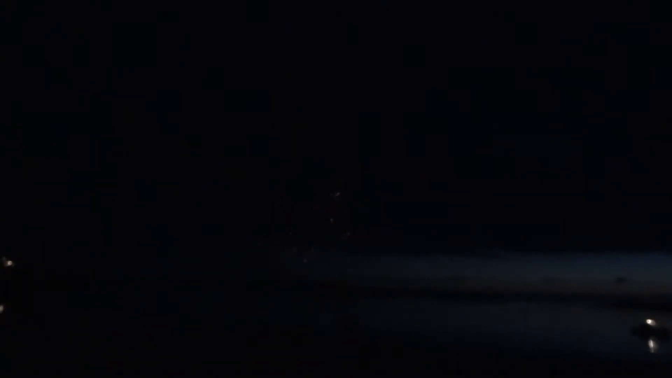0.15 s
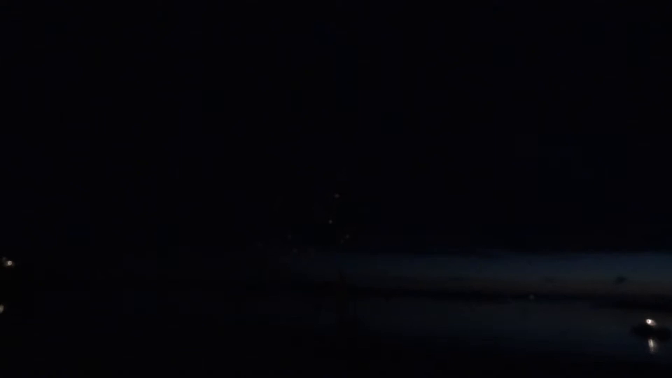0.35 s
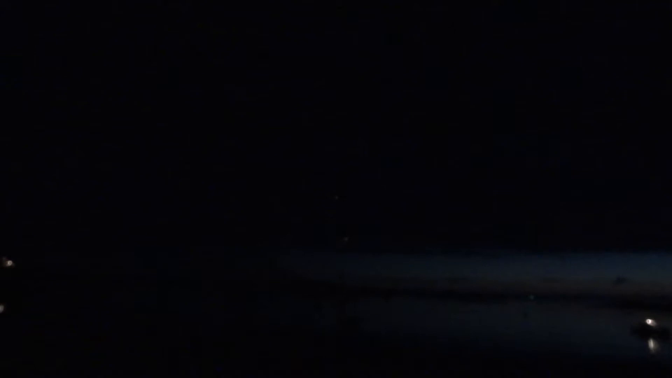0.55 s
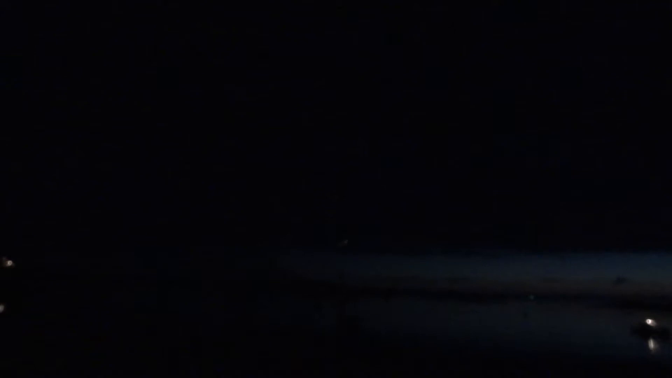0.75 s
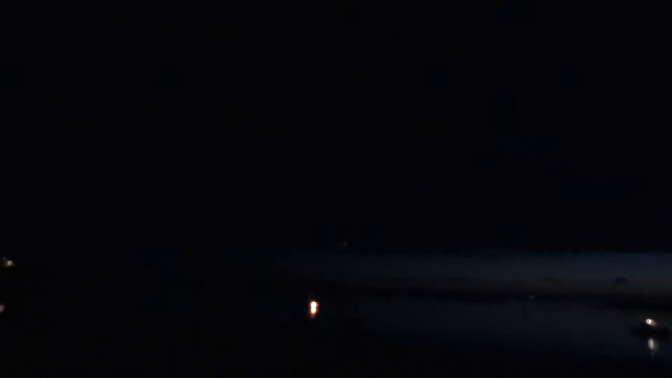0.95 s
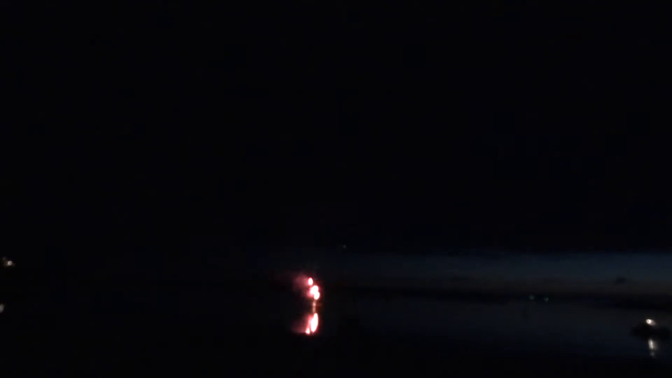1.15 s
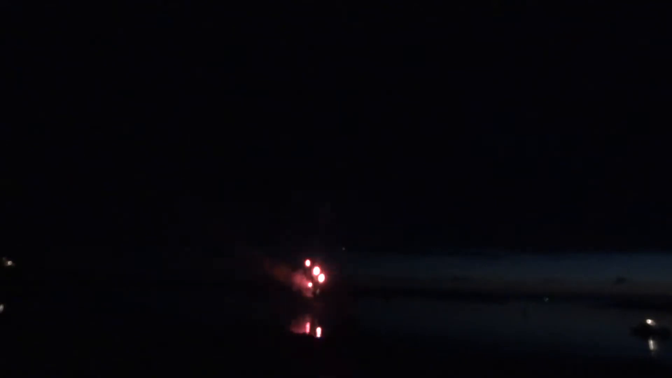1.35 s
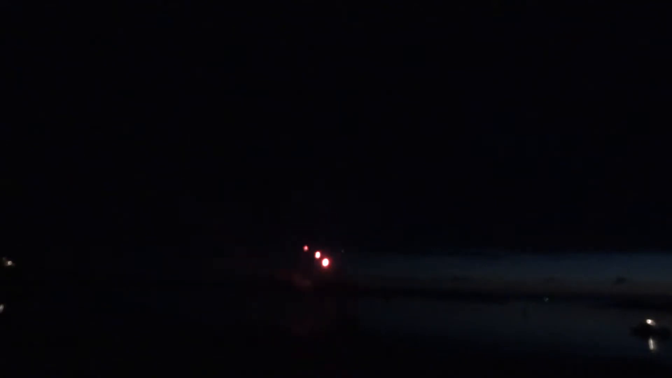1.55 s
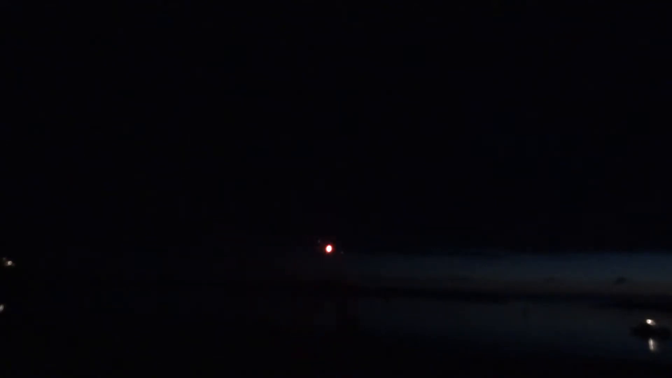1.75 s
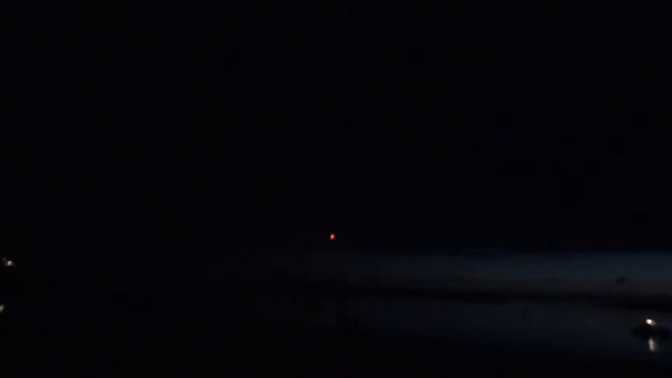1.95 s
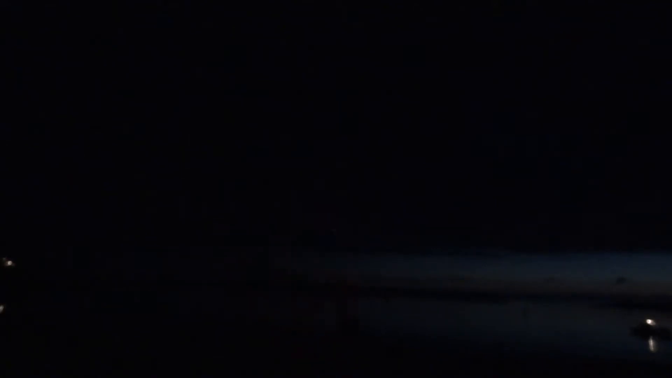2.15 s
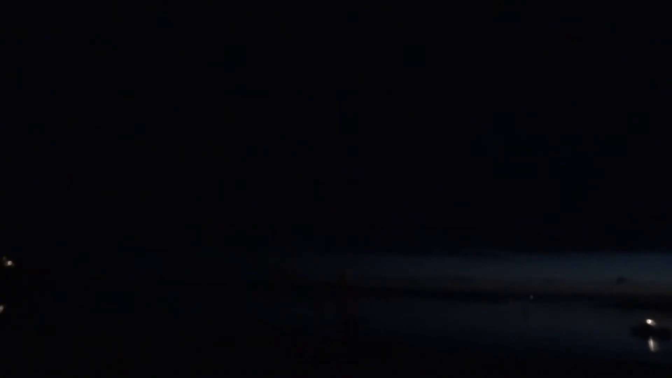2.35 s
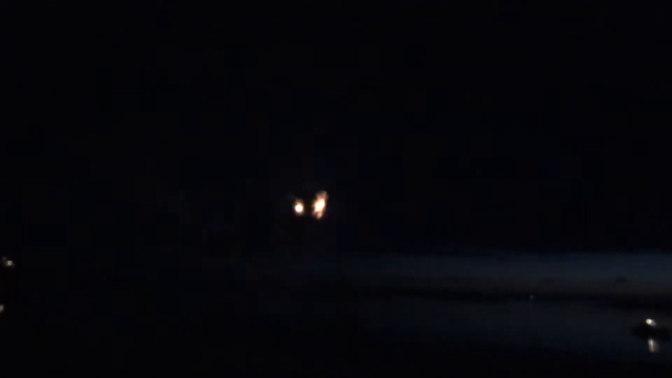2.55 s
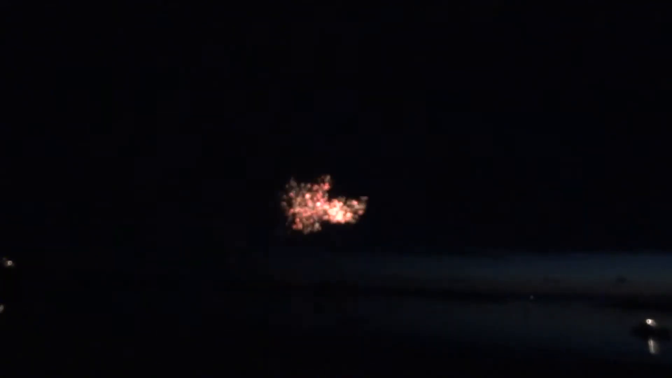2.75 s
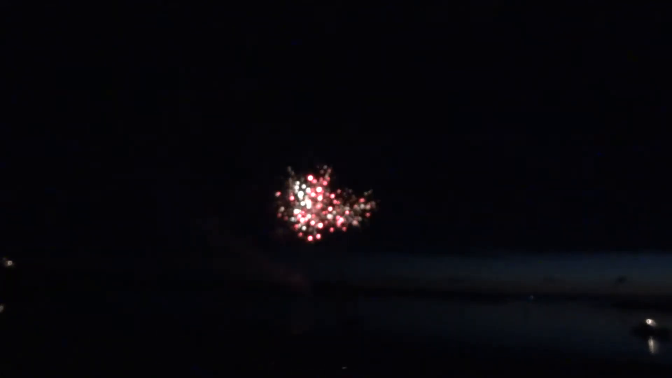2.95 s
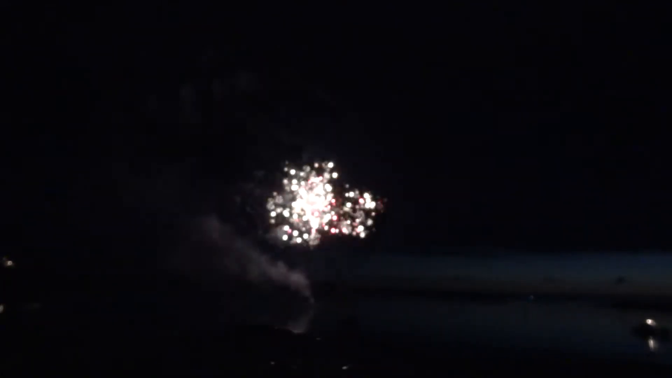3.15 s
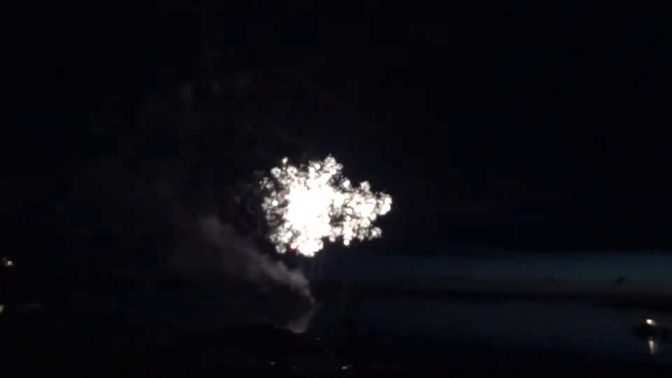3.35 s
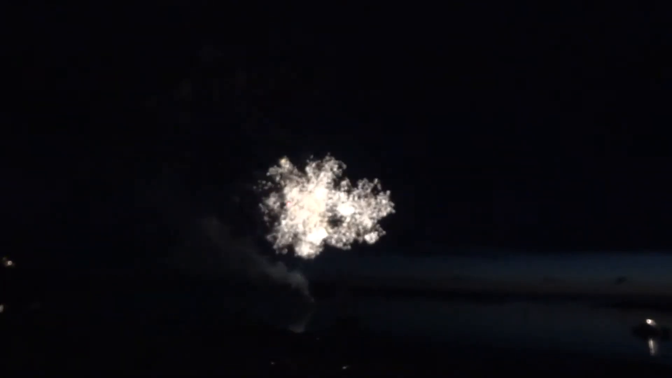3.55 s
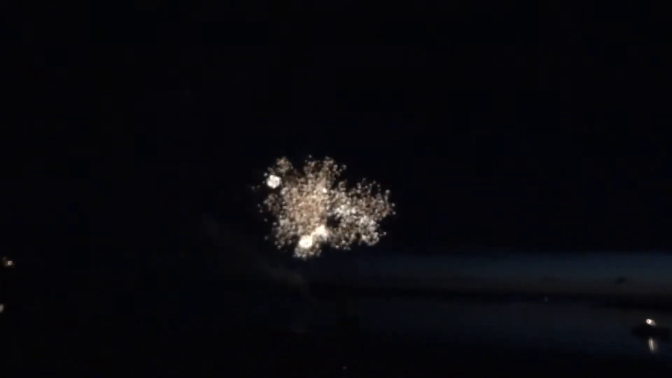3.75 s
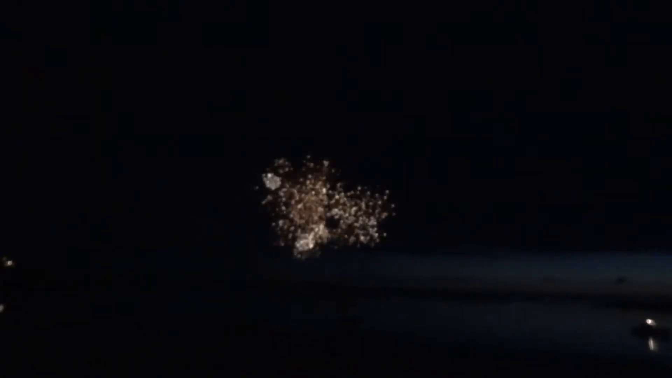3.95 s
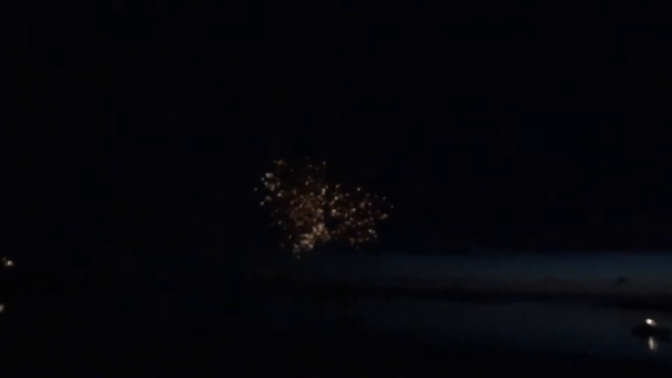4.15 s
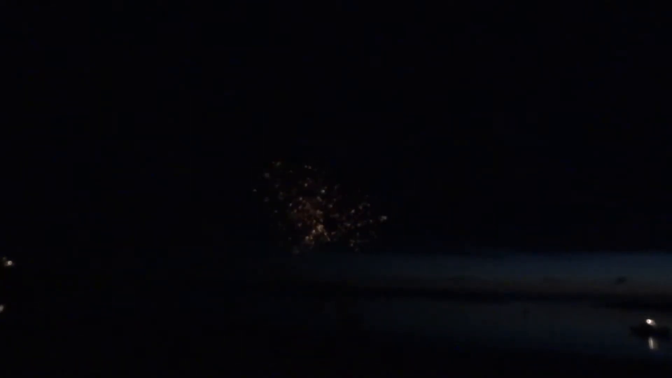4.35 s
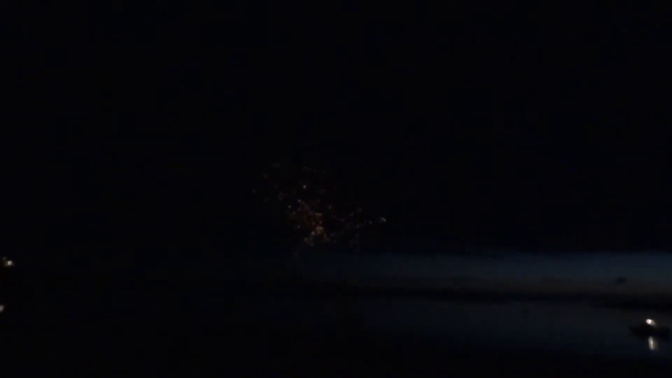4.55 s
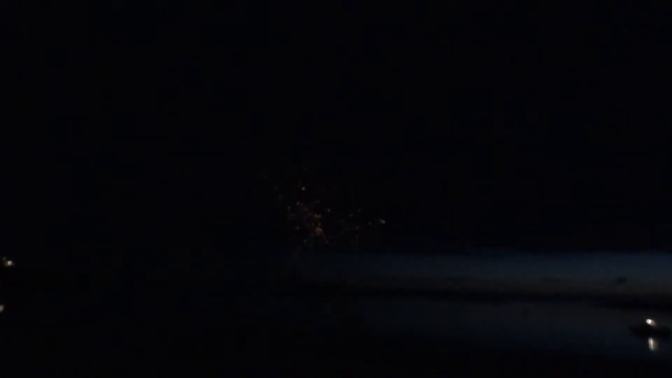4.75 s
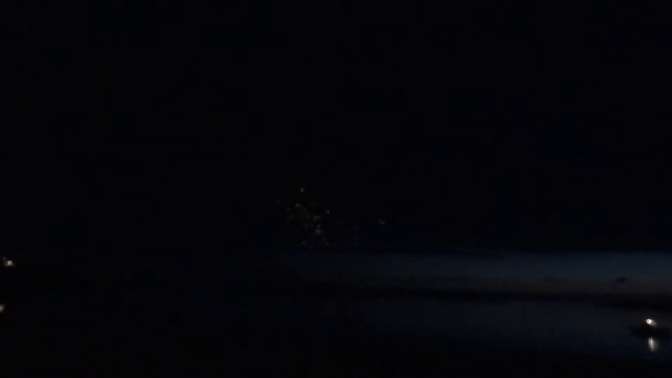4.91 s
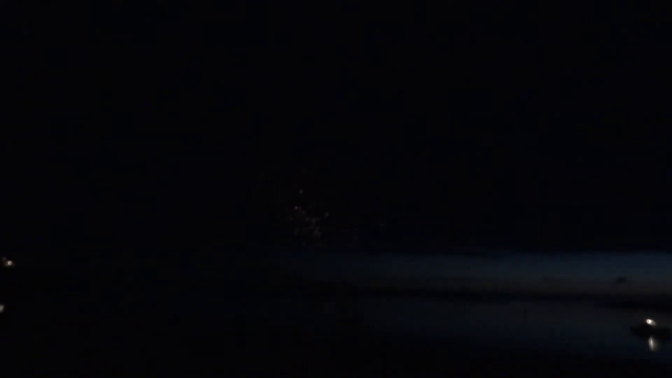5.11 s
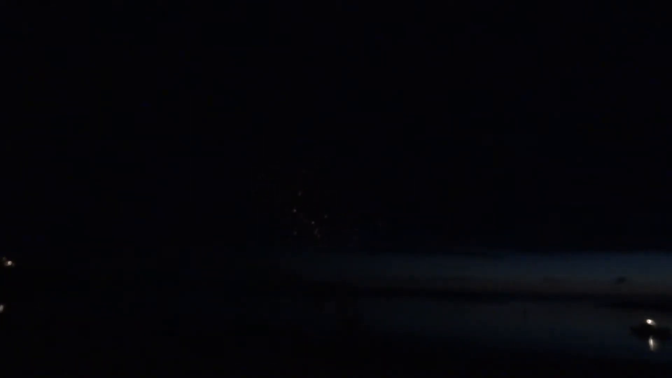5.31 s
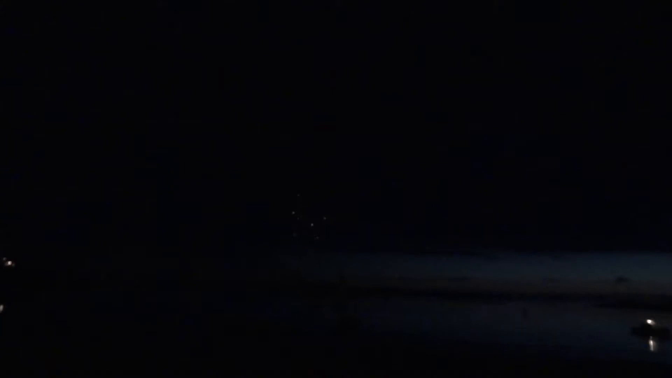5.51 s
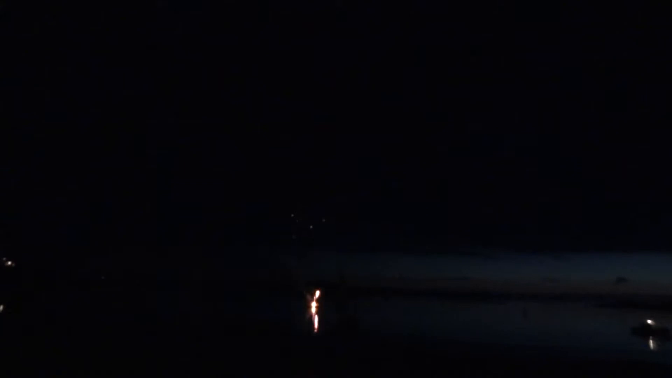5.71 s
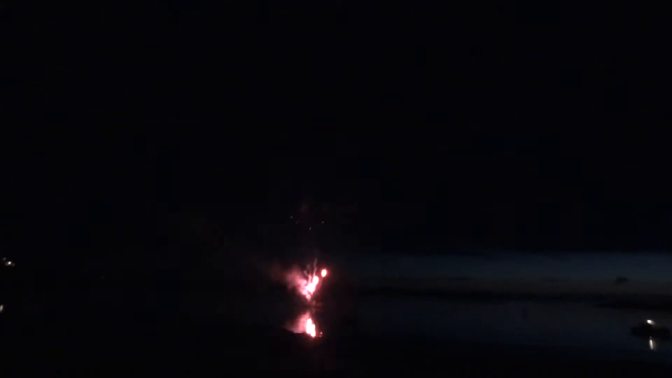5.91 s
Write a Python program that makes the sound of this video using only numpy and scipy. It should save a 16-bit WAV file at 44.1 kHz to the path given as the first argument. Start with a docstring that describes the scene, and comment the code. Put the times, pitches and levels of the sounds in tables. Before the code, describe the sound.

Fireworks over a harbour at night. As an earlier salvo fades, three mortars thump in quick succession and echo off the quays. A rapid cluster of loud shell bursts follows, then a cloud of crackling sparks swells and thins to single snaps. The shores return separate echoes, a low roll and a dulling hiss. Clothing rustles softly close to the microphone.

```python
"""Fireworks over a harbour at night: three mortars thump, a salvo of shells bursts, and a cloud of
crackling stars swells and thins out to single snaps. Each bang and snap is a shock wave, a push of air
followed by suction. The shores send it all back as single echoes, a low roll and a dulling hiss, while
an earlier salvo is still dying away. Clothing rubs and creaks softly near the microphone."""
import sys
import numpy as np
from scipy import signal
from scipy.fft import rfft, irfft
from scipy.io import wavfile

SR = 44100
rng = np.random.default_rng(int(sys.argv[2]) if len(sys.argv) > 2 else 0)


def store_pcm(level_fs):
    """Save levels as 16-bit WAV."""
    pcm = np.round(np.clip(level_fs, -1, 1) * 32767).astype(np.int16)
    wavfile.write(sys.argv[1], SR, np.atleast_2d(pcm).T)


N = 263718
TIME = np.arange(N) / SR

# shells bursting overhead: start_s, level_db, edge_hz
SHELL_BURSTS = [(3.1810, 0, 4020), (3.1907, -1.5, 3620), (3.2206, -7, 3000), (3.2277, 0.5, 4250),
                (3.237, -3.5, 4220), (3.2662, 0.5, 4500), (3.2687, -9, 1800), (3.2961, -0.5, 4700),
                (3.3057, -2, 3860), (3.3371, -7, 2200), (3.3642, -4, 3000), (3.3819, -2.5, 5630),
                (3.4295, -2.5, 6650), (3.5183, -11, 1500), (3.5427, -10, 6500), (3.559, -11, 5540),
                (3.6034, -2, 6040)]
# swarms of crackling sparks, silent if the end precedes the start:
# start_s, thickest_s, end_s, snaps_per_s, level_db
SPARK_SWARMS = [(1.74, 1.792, 2.45, 61, -26), (3.177, 3.35, 2.8, 110, -18), (3.658, 3.851, 4.33, 950, -4)]
# single stars that snap clear of the cloud: start_s, level_db
STAR_SNAPS = [(3.623, 1.5), (3.6446, 0), (3.673, -3), (4.1266, -5), (4.1376, -8), (4.1473, -5),
              (4.1622, -4), (4.1708, -3.5), (4.184, -10), (4.2027, -3), (4.2100, -5.5), (4.2185, -7),
              (4.2500, -6.5), (4.2557, -8), (4.3018, -5.5), (4.3039, -2.5)]
# tone of the crackle: frequency_hz, gain_db
CRACKLE_EQ = [(300, 3), (900, -3.5), (1700, -4), (2800, -1), (4200, 1), (6000, -3), (11000, -11)]
# mortar shots: start_s, level_db, push_ms, edge_hz, wet_db
MORTAR_SHOTS = [(1.642, -1.5, 1.64, 4000, 5.5), (1.7035, -2, 1.3, 4570, -3.5), (1.7493, -3, 1.54, 5950, 3)]
# slapback from flat faces near the mortars: delay_s, gain_db
MORTAR_SLAPS = [(.0031, -21), (.0052, -37), (0.017, -14.5), (0.0313, -17.5)]
# distinct echoes from quays and far shores: start_s, level_db, push_ms
QUAY_ECHOES = [(.0625, -20, 1.3), (.0810, -24, 3.3), (0.2397, -19, 1.6), (0.741, -39, 1.3),
               (1.7802, -15, 0.28), (1.7968, -18, 0.26), (1.8492, -15.5, 0.26), (1.8907, -10.5, 0.15),
               (1.9570, -17, 1.6), (2.0231, -22, 0.26), (2.0691, -16, 0.17), (2.2341, -19.5, 0.26),
               (2.5564, -24.5, 1.14), (2.6190, -23.5, 0.81), (2.963, -22.5, 1.4), (4.495, -15, 1.1),
               (4.5422, -6, 0.86), (4.6885, -14, 1.5), (4.7450, -14.5, 1.1), (4.7880, -14, 0.23),
               (4.811, -17, .26), (4.9566, -19, 1.6), (4.9660, -14, 0.75), (5.106, -21, 1.2),
               (5.1202, -28, 1)]
# volleys that the harbour answers; mortars at ground level barely reach the far shores:
# start_s, length_s, roll_db, hiss_db, far_send_db
VOLLEY_SENDS = [(1.673, .12, -22, -35.5, -27), (3.176, 0.38, -15.5, -29, -0.5),
                (3.614, .14, -16.5, -23, -19), (3.748, 0.22, -37, -27.5, 2.5)]
# returns from the near bank and the whole basin: delay_s, linger_s, roll_db, hiss_db
NEAR_BANKS = [(0, 0.024, -1, -5.5), (0.03, 0.56, -3.5, 2.5)]
# later returns from two far shores: delay_s, linger_s, roll_db, hiss_db
FAR_SHORES = [(.72, 0.16, -11, -6), (1.29, 0.19, -8.5, -9.5)]
# tone of the low roll: frequency_hz, gain_db
ROLL_EQ = [(15, -65), (25, -36), (96, -15), (139, -7.5), (223, -2), (289, -1.5), (313, -1), (419, -3),
           (517, -7), (560, -9.5), (628, -15), (957, -16.5), (1200, -23.5), (1560, -25.5), (2640, -120)]
# tone of the hiss before the air dulls it: frequency_hz, gain_db
HISS_EQ = [(300, -33), (600, 3), (800, -0.5), (1300, 0.5), (2000, 0), (3000, -3.5), (5000, -9),
           (7000, -16.5), (11000, -26.5)]
# booms that hang over the water after the mortars and the first bursts: start_s, level_db
DEEP_BOOMS = [(1.7, -38), (3.19, -40)]
# tone of the booms: frequency_hz, gain_db
BOOM_EQ = [(20, -22), (50, -7.5), (90, 2), (130, 6), (250, -24), (600, -78)]
# rubs of cloth: start_s, length_s, level_db
CLOTH_RUBS = [(1.454, 0.082, -44), (2.162, 0.089, -41.5), (2.65, 0.067, -45), (2.739, 0.069, -46.5)]
# moments when the cloth catches: centre_s, level_db
CLOTH_CATCHES = [(1.31, -52), (1.473, -40), (1.972, -41), (2.1657, -28), (2.191, -37), (2.212, -37),
                 (2.684, -33.5), (2.746, -38), (2.7876, -45)]
# tone of the rubbing fibres: frequency_hz, gain_db
CLOTH_EQ = [(800, -15), (2000, -0.5), (3600, 4.5), (5000, 6), (6400, 7.5), (8300, -1), (10300, 3.5),
            (11500, -8)]
# stereo image, where a likeness of 1 is mono: frequency_hz, likeness
STEREO_LIKENESS = [(30, 1), (110, 1), (270, 1), (580, 0.95), (1200, 0.88), (2600, 0.9), (5500, 0.78),
                   (11000, 0.71)]


def shock_wave(push_ms, edge_hz, recoil, low_cut_hz=175, turn_hz=2100, size=2048):
    """One bang of peak 1: a jump, a push, then suction. Recoil deepens the suction towards an N shape."""
    age = np.arange(size) / SR / (push_ms / 1000)  # in push lengths
    wave = (1 - age) * ((1 - recoil) * np.exp(-age) + recoil * np.exp(-(age / 2) ** 4))
    jf = 1j * np.fft.rfftfreq(size, 1 / SR)
    air = 1 / (1 + jf / edge_hz) ** 2  # distance rounds the front
    low_cut = jf ** 2 / (jf ** 2 + 2.12 * jf * low_cut_hz + low_cut_hz ** 2)
    turn = (turn_hz - jf) / (turn_hz + jf)  # the microphone inverts the treble: a thin spike leads
    wave = irfft(rfft(wave) * air * low_cut * turn)
    return wave / abs(wave).max()


def bangs(cues, recoil):
    """A mono track with one shock wave on each cue."""
    out = np.zeros(N)
    for start, db, push_ms, edge_hz in cues:
        add(out, start, amp(db) * shock_wave(push_ms, edge_hz, recoil))
    return out


def shells(push_ms=1.05):
    """Shells of one size burst in the open sky and arrive as N-shaped waves, almost dry."""
    cues = [(start, db, push_ms, edge_hz) for start, db, edge_hz in SHELL_BURSTS]
    return scatter(bangs(cues, recoil=0.84), wet_db=-8, t60_s=0.15, bass_db=-10)


def stars(push_ms=0.12, edge_hz=5000, recoil=0.45, low_cut_hz=400, spread_db=3, thin_db=-1.5, sizes=5):
    """Stars crackle as tiny shock waves: at random in swarms that swell and thin out, and singly."""
    crackle = np.zeros(N)
    for size in np.geomspace(0.75, 1.4, sizes):
        clicks = np.zeros(N)
        for start, thickest, end, per_s, db in SPARK_SWARMS:
            density = np.sin(np.pi / 2 * np.interp(TIME, [start, thickest, end], [0, 1, 0])) ** 2
            fired = rng.random(N) < density * per_s / sizes / SR
            snap_db = db + thin_db * (1.5 - density[fired])  # weaker where the swarm is thin
            clicks[fired] += amp(snap_db - spread_db * rng.exponential(1, N)[fired])
        crackle += signal.oaconvolve(clicks, shock_wave(push_ms * size, edge_hz, recoil, low_cut_hz))[:N]
    snap = shock_wave(push_ms, edge_hz, recoil, low_cut_hz)
    for start, db in STAR_SNAPS:
        add(crackle, start, amp(db) * snap)
    return scatter(equalise(crackle, CRACKLE_EQ), wet_db=-11, t60_s=0.07)


def mortars():
    """Each lift charge thumps, rattles off nearby things and slaps back from flat faces."""
    out = np.zeros((2, N))
    for *shot, wet_db in MORTAR_SHOTS:
        thump = bangs([shot], recoil=0.79)
        slapped = thump.copy()
        for delay, db in MORTAR_SLAPS:
            add(slapped, delay, amp(db) * thump)
        out += scatter(slapped, wet_db, t60_s=0.076, bass_db=-12.5, treble_db=-1)
    return out


def scatter(direct, wet_db, t60_s, bass_db=0, treble_db=0, taps_per_s=4000, size=22050):
    """Direct sound plus a stereo tail of small reflections from ground and ripples."""
    t = TIME[:size]
    taps = rng.standard_normal((2, size)) * (rng.random((2, size)) < taps_per_s / SR)
    fade_in = np.clip(t / 0.0015 - 1, 0, 1)
    tail = stereo(*taps) * amp(-60 * t / t60_s) * fade_in
    tone = [(150, bass_db), (500, bass_db / 2), (2000, 0), (8000, treble_db)]
    tail = equalise(tail / np.linalg.norm(tail[0]), tone)
    return direct + amp(wet_db) * signal.fftconvolve(direct[None], tail, axes=1)[:, :N]


def echoes(edge_at_1_ms_hz=930):
    """Single echoes stand out of the roll: long pushes as dull thuds, short ones as cracks."""
    cues = [(start, db, push_ms, edge_at_1_ms_hz / np.sqrt(push_ms)) for start, db, push_ms in QUAY_ECHOES]
    return scatter(bangs(cues, recoil=1), wet_db=-7, t60_s=0.021, bass_db=-14.5)


def bank_response(t, banks, levels_db):
    """Echo power over time: each bank answers after its delay, then dies away."""
    power = 0
    for (delay, linger, *_), db in zip(banks, levels_db):
        onset = np.clip((t - delay) / t[1] + 1, 0, 1)
        power += amp(db) ** 2 * onset * np.exp(-abs(t - delay) / linger) * t[1] / linger
    return power


def returned_power(t, loss_db_per_s, volley_db, near_db, far_db, ramp_s=0.031):
    """Every volley comes back delayed and smeared by the banks, fading on its way."""
    near = bank_response(t, NEAR_BANKS, near_db)
    far = bank_response(t, FAR_SHORES, far_db)
    loss = amp(-np.outer(loss_db_per_s, t)) ** 2
    power = 0
    for (start, length, *_, far_send_db), db in zip(VOLLEY_SENDS, volley_db):
        sent = amp(db) ** 2 * np.clip(np.minimum(t - start, start + length - t) / ramp_s, 0, 1)
        response = (near + amp(far_send_db) ** 2 * far) * loss
        power += signal.fftconvolve(sent[None], response, axes=1)
    return abs(power[:, :len(t)])


def harbour(air_db_per_khz_s=2.5, earlier_age_s=1.01):
    """The shores return the bangs as a roll, and the crackle as a hiss that dulls with distance."""
    tables = (VOLLEY_SENDS, NEAR_BANKS, FAR_SHORES)
    roll_db, hiss_db = zip(*(np.transpose(table)[2:4] for table in tables))
    roll = evened(equalise(patter(per_s=1100, spread_db=0.91), ROLL_EQ))
    hz, t, hiss_bands = signal.stft(patter(per_s=4500, spread_db=1.87), SR, nperseg=256)
    air_db_per_s = air_db_per_khz_s * hz / 1000
    # an earlier salvo is still dying away
    earlier_roll = amp(-32.5 - 3.5 * t)
    earlier_hiss = amp(-34.5 - 7 * t - np.outer(air_db_per_s, earlier_age_s + t))
    roll_level = np.sqrt(returned_power(t, 0, *roll_db)[0] + earlier_roll ** 2)
    hiss_level = np.sqrt(returned_power(t, air_db_per_s, *hiss_db) + earlier_hiss ** 2)
    tone = amp(curve_at(HISS_EQ, hz))[:, None]
    tone /= np.sqrt((tone[(hz > 1200) & (hz < 3000)] ** 2).sum() / len(hz))  # the mids set the level
    hiss = signal.istft(hiss_bands * tone * hiss_level, SR, nperseg=256)[1][:, :N]
    return roll * np.interp(TIME, t, roll_level) + hiss


def booms(rise_s=0.019, decay_db_per_s=22):
    """The deepest part of the big bangs comes back at once and dies away evenly."""
    envelope = np.zeros(N)
    for start, db in DEEP_BOOMS:
        age = TIME - start
        envelope += np.clip(age / rise_s, 0, 1) * amp(db - decay_db_per_s * abs(age))
    rumble = equalise(stereo(*rng.standard_normal((2, N))), BOOM_EQ)
    return evened(rumble) * envelope


def creak(fibres, span_s=(0.266, 0.405), slips_per_s=(140, 50), level_db=(-49.5, -41.5), decay_s=0.0036):
    """Cloth sticks and slips: a run of ticks that slows as it grows louder."""
    rate = np.interp(TIME, span_s, slips_per_s, left=0, right=0)
    slips = np.diff(np.floor(np.cumsum(rate) / SR), prepend=0)
    slips *= amp(np.interp(TIME, span_s, level_db))
    tick = fibres[:, :600] * np.exp(-TIME[:600] / decay_s)
    return signal.oaconvolve(slips[None], tick, axes=1)[:, :N]


def cloth(catch_s=0.0072, pan_db=0.9):
    """Fibres rub, catch and creak in short bright strokes, close by and a little to the right."""
    fibres = evened(equalise(patter(per_s=14000, spread_db=1.1), CLOTH_EQ))
    catches = [(centre - catch_s / 2, catch_s, db) for centre, db in CLOTH_CATCHES]
    envelope = np.zeros(N)
    for start, length, db in [*CLOTH_RUBS, *catches]:
        add(envelope, start, amp(db) * signal.windows.tukey(round(length * SR), 0.5))
    return (fibres * envelope + creak(fibres)) * amp([[-pan_db], [pan_db]])


def patter(per_s, spread_db):
    """Grainy stereo noise at rms 1: countless clicks of uneven strength."""
    strength = amp(spread_db * np.minimum(rng.exponential(1, (2, N)), 4))
    polarity = rng.choice([-1, 1], (2, N))
    fired = rng.random((2, N)) < per_s / SR
    return evened(stereo(*(strength * polarity * fired)))


def stereo(a, b):
    """Two unrelated signals become left and right, mono in the bass and wider on top."""
    size = len(a)
    likeness = curve_at(STEREO_LIKENESS, np.fft.rfftfreq(size, 1 / SR))
    mid = irfft(rfft(a) * np.sqrt((1 + likeness) / 2), size)
    side = irfft(rfft(b) * np.sqrt((1 - likeness) / 2), size)
    return np.array([mid + side, mid - side])


def equalise(x, eq):
    """Shapes the tone of x with an EQ curve."""
    size = x.shape[-1]
    return irfft(rfft(x) * amp(curve_at(eq, np.fft.rfftfreq(size, 1 / SR))), size)


def curve_at(points, hz):
    """A curve's value at hz, on a log-frequency axis."""
    point_hz, value = np.transpose(points)
    return np.interp(np.log(hz + 1), np.log(point_hz + 1), value)


def amp(db):
    """Decibels to gain."""
    return 10 ** (np.asarray(db) / 20)


def evened(x):
    """Scales to rms 1."""
    return x / np.sqrt(np.mean(x ** 2) + 1e-20)


def add(mix, start_s, sound):
    """Mixes a sound in at start_s."""
    part = mix[max(round(start_s * SR), 0):][:len(sound)]
    part += sound[:len(part)]


def scene():
    """The fireworks, the harbour's answer and the cloth over a faint even hiss."""
    floor = amp(-65.5) * stereo(*rng.standard_normal((2, N)))
    return mortars() + shells() + stars() + echoes() + harbour() + booms() + cloth() + floor


def record(dry, ceiling=0.66, cutoff_hz=11150):
    """A soft clip rounds the loudest peaks, then a steep low-pass takes off the top."""
    clipped = dry / (1 + (dry / ceiling) ** 4) ** (1 / 4)
    low_pass = signal.firwin(301, cutoff_hz, window=("kaiser", 8), fs=SR)
    return signal.oaconvolve(clipped, low_pass[None], "same", axes=1)


dry = scene()
out = record(dry)
store_pcm(out)
```